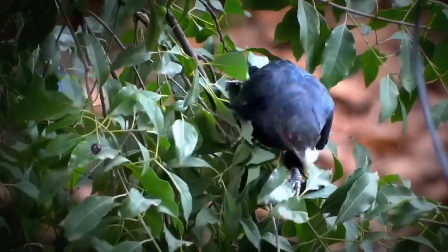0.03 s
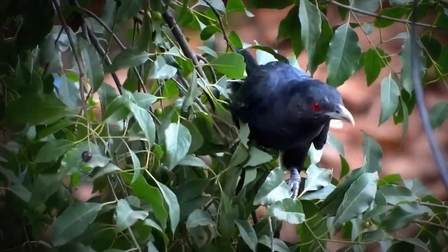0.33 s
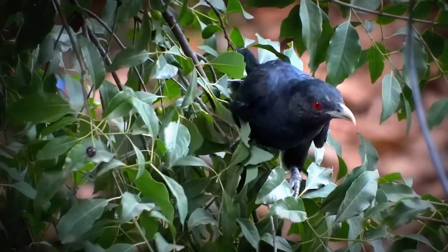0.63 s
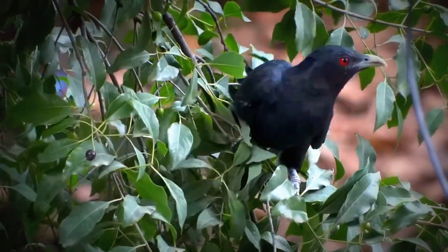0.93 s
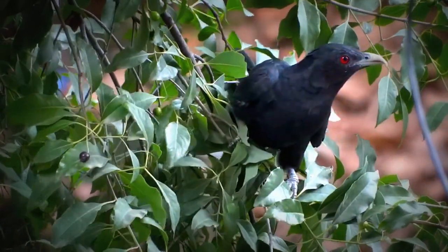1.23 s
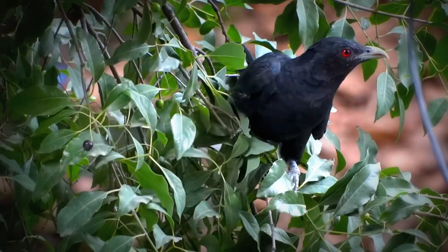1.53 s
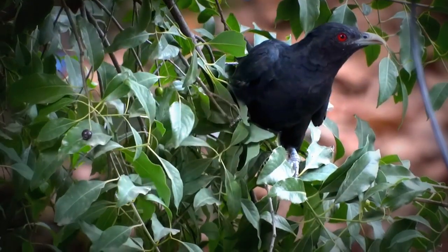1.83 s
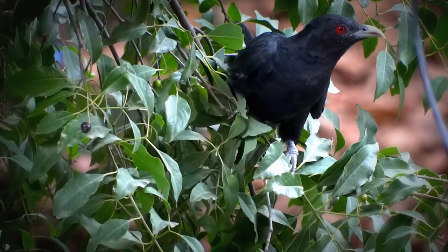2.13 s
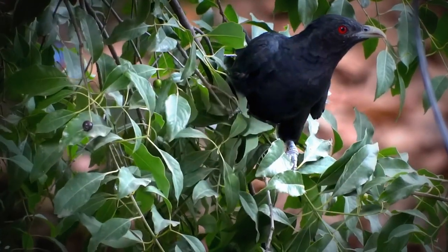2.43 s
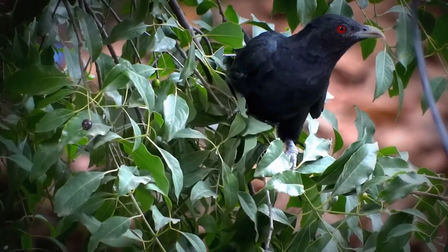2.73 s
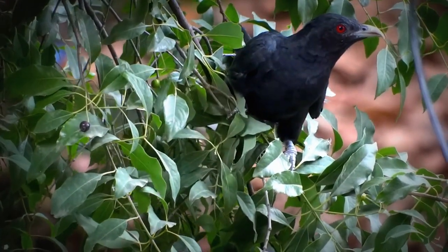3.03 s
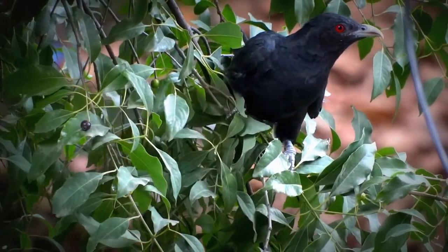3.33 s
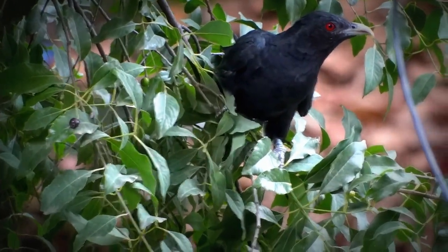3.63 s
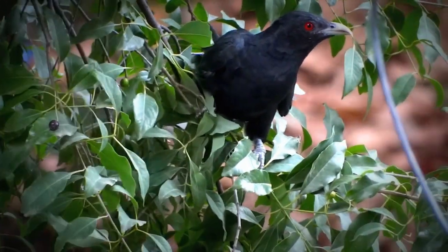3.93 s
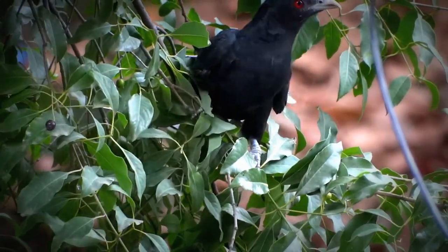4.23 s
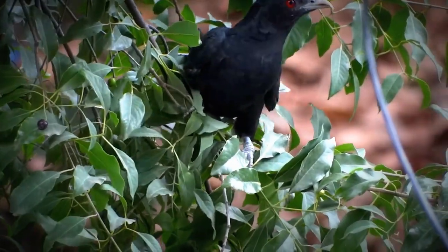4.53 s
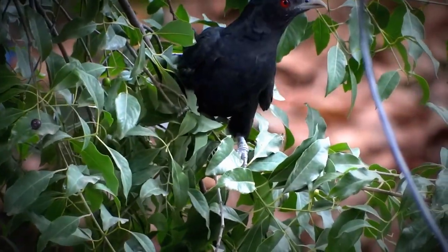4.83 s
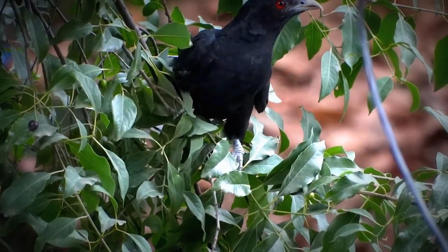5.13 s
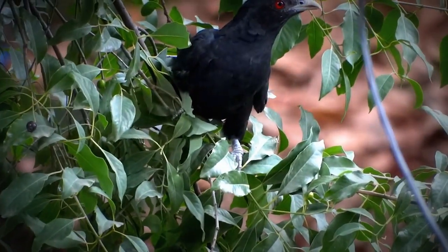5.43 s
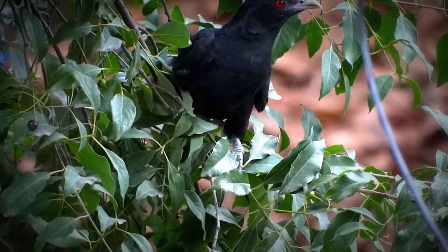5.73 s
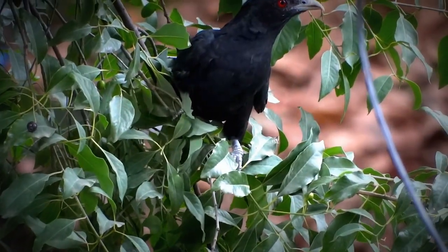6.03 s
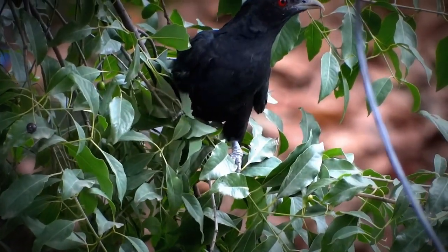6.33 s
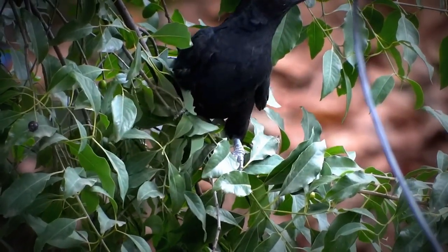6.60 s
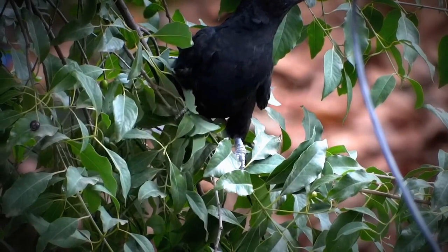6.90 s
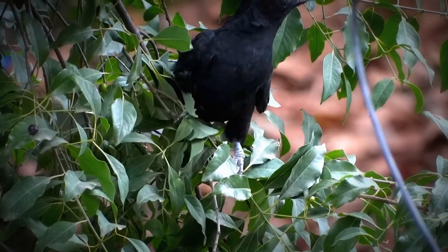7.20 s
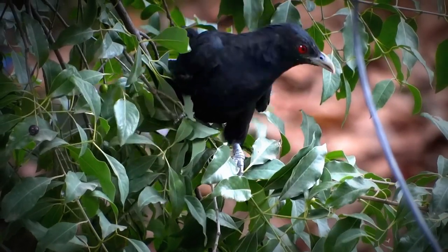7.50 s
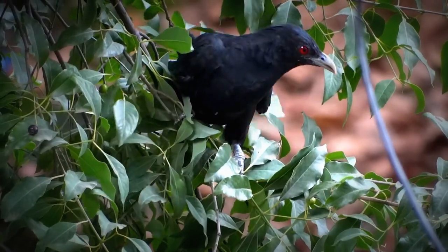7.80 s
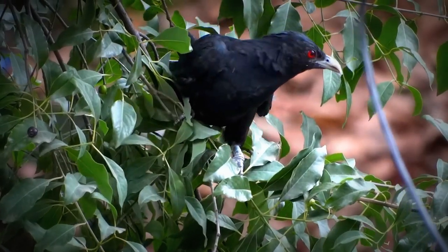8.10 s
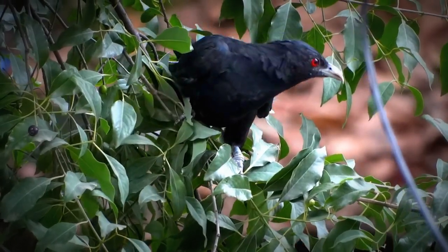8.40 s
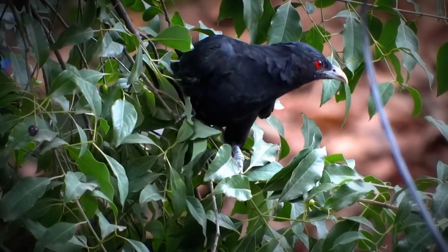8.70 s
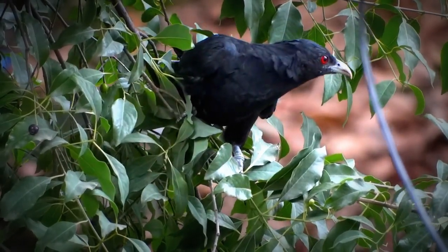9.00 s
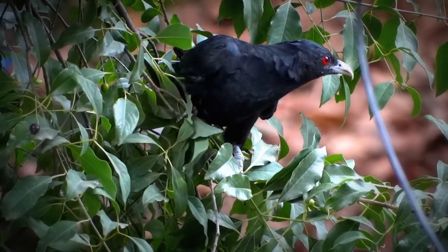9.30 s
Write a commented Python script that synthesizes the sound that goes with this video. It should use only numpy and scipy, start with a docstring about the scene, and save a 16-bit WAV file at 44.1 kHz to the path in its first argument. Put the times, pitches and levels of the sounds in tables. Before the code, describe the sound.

Several small birds trade quick chirps, sliding whistles and high whipping notes outdoors over a soft, steady background of air and far traffic.

```python
"""Small songbirds chatter in a leafy tree: two on the left whistle dips and long slides, one on the
right pips and whips upward, another repeats rising chirps. Each note is a trembling, nearly pure
syrinx tone, scattered by foliage; short lead-in notes open most phrases. Fainter birds call further
off, leaves brush together, an insect buzzes on and off, and distant traffic rumbles underneath."""
import sys
import numpy as np
from scipy import signal
from scipy.fft import rfft, irfft
from scipy.io import wavfile
from scipy.ndimage import uniform_filter1d, map_coordinates

SR = 44100
rng = np.random.default_rng(int(sys.argv[2]) if len(sys.argv) > 2 else 0)


def to_wav(s):
    """Save 16-bit WAV."""
    ch = np.atleast_2d(s).T  # columns
    pcm = np.round(np.clip(ch, -1, 1) * 32767)  # PCM
    wavfile.write(sys.argv[1], SR, pcm.astype(np.int16))


N = 421155

# Levels are relative, ahead of the mix gains. Pan is left minus right.
# Note contours. Each row: fraction of the note's length, pitch ratio, level in dB.
CHIRP_SHAPE = [(0, .6, -30), (.08, .7, -14), (.16, .77, -1), (.3, .85, .5), (.46, .94, -1), (.6, .99, 0),
               (.82, 1, 0), (.93, .99, -4), (1, .97, -15)]
SAG_SHAPE = [(0, .95, -17), (.15, 1, 3.5), (.45, 1.01, 3), (.7, .96, 3.5), (1, 0.81, -3)]
DIP_SHAPE = [(0, 1.46, -14), (.04, 1.4, -4), (.15, 1.22, -6), (.25, 1.04, 1), (.45, .99, -.5),
             (.6, .92, -7), (.68, 1.2, -7), (.74, 1.43, -5), (.86, 1.54, -4), (.96, 1.59, -6),
             (1, 1.6, -16)]
DIP_LEAD_SHAPE = [(0, .71, -17), (.2, .78, -12), (.4, .89, -6), (.62, .995, 0), (.8, 1, -4), (1, .96, -17)]
SLIDE_SHAPE = [(0, 1.09, -13), (.12, 1.01, -3), (.28, .95, -2), (.45, .84, -4), (.62, .69, -9),
               (.82, .57, -11), (1, .49, -20)]
WHIP_SHAPE = [(0, .57, -24), (.2, .55, -6), (.42, .525, -2), (.48, .51, -9), (.56, .61, -2),
              (.65, .71, 4.5), (.7, .82, -4), (.75, .95, -7), (.84, 1, -4), (.94, .995, -6), (1, .98, -19)]
PIP_SHAPE = [(0, .99, -18), (.25, 1.015, -7), (.55, 1.02, -3), (.72, 1, 2.5), (.85, .98, -1), (1, .94, -18)]
HOOT_SHAPE = [(0, 0.88, 0), (.3, 1, 3), (.6, 0.98, 5.5), (1, .94, -3.5)]
# Rising chirps. Each row: start and length in seconds, pitch in Hz, level, pan and swell in dB.
CHIRPS = [(2.439, 0.069, 3576, -37, -1, 13), (2.823, 0.072, 3540, -38, -1.5, 3),
          (3.957, 0.069, 3557, -34, -3, 5), (4.277, 0.071, 3560, -34, -2.5, -1.5),
          (4.599, 0.075, 3560, -35.5, -2.5, -5), (4.943, 0.082, 3590, -32.5, -3, -7.5),
          (5.267, .084, 3580, -34, -3.5, -3), (5.597, 0.079, 3573, -34, -3.5, -10),
          (8.997, 0.088, 3410, -39, -6, 4), (9.324, .075, 3644, -32, -8.5, 15)]
# Whistled notes. Each row: start and length in seconds, pitch in Hz, level and pan in dB.
DIPS = [(.398, 0.11, 3205, -39, 4.5), (.772, .11, 3243, -39, 5), (1.161, 0.11, 3240, -38.5, 5),
        (1.598, 0.11, 3216, -38, 5), (2.256, .107, 3197, -39.5, 5.5), (3.247, 0.1, 3206, -37, 5),
        (9.034, .107, 3163, -42, 4)]
SLIDES = [(.04, 0.25, 5370, -48, 5.5), (.472, 0.31, 5090, -40.5, 4.5), (.922, .25, 5136, -41, 5.5),
          (1.428, 0.27, 5060, -42, 4.5)]
WHIPS = [(-.068, 0.1, 6800, -38, -11), (2.322, .075, 7010, -36, -8), (2.6, 0.067, 6820, -35, -9),
         (2.909, 0.075, 6790, -34, -8), (7.05, 0.08, 6700, -33.5, -7), (7.327, 0.078, 6870, -32, -7.5),
         (7.613, 0.078, 6796, -31, -7)]
# Lead-in notes. Each row: lead time and length in seconds, pitch ratio, level offset in dB.
CHIRP_LEAD = [(0.075, 0.07, .51, -34)]
DIP_LEAD = [(0.126, .05, 1.0, -3.5)]
WHIP_LEAD = [(0.068, 0.0258, .615, -7), (.04, 0.0293, .728, -2)]
HOOT_LEAD = [(0.056, 0.062, .885, -7.5)]

# Swept calls. Each row: start and length in seconds, start and end pitch in Hz, level and pan in dB.
RASPS = [(.25, 0.11, 5090, 3690, -44.5, 4.5), (.85, 0.061, 4600, 5000, -38.5, 5),
         (2.335, .035, 5060, 4920, -41, -1), (4.885, 0.12, 4560, 3560, -47, 6),
         (5.08, 0.077, 5420, 4370, -46.5, 3.5), (8.255, 0.039, 5000, 4100, -59.5, -4),
         (8.548, 0.0264, 5370, 3765, -49, 0), (8.88, 0.048, 5200, 3800, -49.5, -1),
         (9.235, .068, 5570, 3830, -45.5, -3)]
FAINT_WHISTLES = [(0.934, 0.26, 2520, 2420, -63, 7), (1.094, 0.3, 2410, 2280, -64.5, 8),
                  (2.734, 0.049, 3790, 3430, -50, 5), (5.24, .35, 2368, 2372, -59.5, 8.5),
                  (5.555, .03, 3370, 3250, -59, 5), (6.75, 0.038, 3010, 2700, -57, 4),
                  (7.944, 0.065, 3850, 3160, -56, -7), (7.997, 0.054, 4570, 4360, -58, -7),
                  (7.998, 0.058, 2350, 2194, -67, -8)]
# Falling chirps. Each row: start and length in seconds, start pitch in Hz, level and pan in dB.
FALLS = [(2.483, 0.084, 3730, -55.5, 6), (3.32, 0.063, 3280, -68, 3), (3.992, 0.038, 3520, -57, 7),
         (5.644, .028, 5660, -52.5, 2), (6.024, 0.047, 3940, -48.5, 5), (7.768, 0.04, 3670, -61.5, 0),
         (9.402, 0.028, 3950, -53.5, -3)]
FALL_RATIO = .52  # end pitch over start pitch
# Thin peeps and high ticks. Each row: start in seconds, level in dB.
PEEPS = [(3.945, -57), (4.105, -58), (4.465, -60), (6.215, -52), (6.64, -63), (6.78, -62), (6.95, -64)]
TICKS = [(.28, -54), (1.206, -58), (1.435, -58), (4.008, -52), (4.823, -48), (5.669, -52), (6.55, -54),
         (7.337, -57)]
PEEP_S, PEEP_FROM_HZ, PEEP_TO_HZ = .06, 5140, 5160
TICK_S, TICK_FROM_HZ, TICK_TO_HZ = .014, 8200, 7500
# Last notes of three-note tinkles. Each row: start in seconds, start pitch in Hz, level and pan in dB.
TINKLES = [(8.515, 5070, -54, -1), (8.863, 5120, -57, -1), (9.207, 5940, -44.5, -10)]
TINKLE_S, TINKLE_RATIO = .041, .91
# Tinkle openings. Each row: lead time and length in seconds, start and end pitch in Hz, level in dB.
TINKLE_LEAD = [(.07, 0.037, 5820, 5670, -59), (.036, 0.059, 7150, 6480, -61.5)]
# Runs of upward flicks. Each row: start in seconds, count.
FLICK_RUNS = [(7.831, 7), (9.522, 1)]
FLICK_S, FLICK_FROM_HZ, FLICK_TO_HZ, FLICK_EVERY_S, FLICK_DB = .012, 2900, 6000, .147, -53
# Spells of twitter. Each row: start and length in seconds, note count.
TWITTERS = [(4.8, .9, 10), (7.8, 1.7, 22)]
TWITTER_HZ, TWITTER_S, TWITTER_DB = 4380, .0213, -60.5
# Soft hoots. Each row: start in seconds, pitch in Hz, level in dB.
HOOTS = [(.01, 892, -72), (.36, 1007, -69), (.97, 961, -73), (1.68, 996, -70), (2.691, 1014, -66),
         (3.3, 1006, -66.5), (4.879, 1050, -65.5), (5.75, 1014, -64), (6.49, 1016, -68)]
HOOT_S, HOOT_PAN_DB = .079, 4
# Distant calls. Each row: start and length in seconds, pitch in Hz, level in dB.
FAR_CALLS = [(0.698, 0.18, 1390, -73), (1.478, 0.18, 1370, -72.5), (4.204, 0.69, 637, -76),
             (5.225, 0.61, 658, -72.5), (6.25, 0.275, 1330, -78), (8.848, 0.23, 1336, -80)]

# Bouts of activity. Each row: start and length in seconds, level in dB.
RUSTLES = [(0, 0.22, -55.5), (0.75, 0.17, -51), (0.89, 0.25, -46), (3.536, .24, -50.5), (3.73, 0.2, -50),
           (3.913, 0.084, -49), (3.97, 0.57, -60.5), (4.145, 0.077, -57), (4.275, 0.16, -57.5),
           (4.812, 0.083, -54), (4.873, 0.15, -56)]
BUZZES = [(-.05, 0.48, -52.5), (0.422, 0.75, -53), (1.437, 0.78, -56.5), (2.101, 1.18, -52.5),
          (3.256, 0.35, -54), (3.679, 0.27, -49.5), (3.894, .3, -59), (5.642, 1.195, -55),
          (6.842, 1.08, -65.5)]
ENGINE_RUNS = [(-.6, 4.2, -59.5), (2.98, 3.4, -49.5)]
TRAFFIC_SWELLS = [(-.2, 1.3, -68), (6.7, 0.51, -57), (7.8, 0.65, -63.5)]
# Resonances. Each row: centre and width in Hz, level in dB.
INSECT_MODES = [(3545, 30, -8), (3775, 22, -2.5), (4000, 28, -9), (4245, 90, -6), (4730, 28, 3),
                (5085, 36, -1.5), (5310, 44, 2), (5480, 140, -4.5)]
ENGINE_MODES = [(68.4, 14, -1), (92.6, 20, -6.5), (124.4, 9.1, 1.5), (178, 3.8, -8)]
# Noise spectra. Each row: frequency in Hz, relative density in dB.
LEAF_SPECTRUM = [(2000, -18), (3500, -4.5), (5500, 0.5), (8000, -10.5), (11000, -16.5)]
INSECT_SPECTRUM = [(2500, -19), (3200, -9), (3750, 1.5), (4700, 0), (5400, -5), (6000, 1), (7000, -27.5)]
TRAFFIC_SPECTRUM = [(20, -23), (35, -2.5), (55, -3), (75, -0.5), (110, -6), (160, -5.5), (210, -13),
                    (300, -33), (500, -49)]
AIR_SPECTRUM = [(200, 2), (300, 4), (500, 0), (1000, -2), (1500, -4.5), (2200, -6.5), (3200, -11),
                (5000, -2.5), (6500, -6.5), (8000, -3), (9200, -5), (10000, -20), (11000, -28.5)]
AIR_SIDE_SPECTRUM = [(100, 4.5), (280, 7), (600, 5), (1200, 1), (2500, -9), (5000, -3),
                     (9000, -30), (11000, -110)]


def chirping_bird():
    """Rising chirps, each led by a soft low note that arches and sags."""
    chirps = sing(CHIRPS, CHIRP_SHAPE, waver=.009, flutter_db=2.4)
    leads = sing(lead_in(CHIRPS, CHIRP_LEAD), SAG_SHAPE, waver=.011, flutter_db=.5)
    return (undb(-5.5) * foliage(chirps, near_db=-6.5, near_t60_s=.19, far_db=-21, far_t60_s=.38)
            + linger(chirps, hz=3540, width_hz=350, db=-18.5, t60_s=.4)
            + foliage(leads, near_db=-12.5, near_t60_s=.2, far_db=-13, far_t60_s=.5))


def whistling_birds():
    """Two birds deep in the leaves, left: dips led by an upward chirp, and long falling slides."""
    dips = sing(DIPS, DIP_SHAPE, waver=.012, flutter_db=1.8, rasp=.008, climb_rasp=.04)
    slides = sing(SLIDES, SLIDE_SHAPE, waver=.008, flutter_db=1.8, rasp=.012)
    leads = sing(lead_in(DIPS, DIP_LEAD), DIP_LEAD_SHAPE, waver=.016, flutter_db=1.5)
    scattered = foliage(dips + slides + leads, near_db=-4, near_t60_s=.15, far_db=-12, far_t60_s=.5)
    return undb(-1.14) * scattered + linger(dips + slides, hz=5000, width_hz=300, db=-8, t60_s=.6)


def whipping_bird():
    """Two pips, then a whip up an octave, on the right."""
    whips = sing(WHIPS, WHIP_SHAPE, waver=.009, flutter_db=1.6, rasp=.008, climb_rasp=.025)
    pips = sing(lead_in(WHIPS, WHIP_LEAD), PIP_SHAPE, waver=.012, flutter_db=1.5, rasp=.014)
    song = echo(whips + pips, lag_s=.029, db=-14)
    return (undb(-4.5) * foliage(song, near_db=-3.5, near_t60_s=.16, far_db=-13.5, far_t60_s=.55)
            + linger(song, hz=6700, width_hz=500, db=-10, t60_s=.47))


def lead_in(notes, leads):
    """Opening notes follow their main note's pitch, level and pan."""
    return [(start - ahead_s, length_s, hz * ratio, db + offset_db, pan_db)
            for start, _, hz, db, pan_db, *_ in notes for ahead_s, length_s, ratio, offset_db in leads]


def sing(notes, shape, waver, flutter_db, rasp=0, climb_rasp=0):
    """A run of notes with one contour and one voice."""
    out = np.zeros((2, N))
    for start, *row in notes:
        add(out, start, note(shape, waver, flutter_db, rasp, climb_rasp, *row))
    return out


def note(shape, waver, flutter_db, rasp, climb_rasp, length_s, hz, db, pan_db, swell_db=0):
    """A contour scaled to length and pitch; climb_rasp adds hoarseness on fast rises."""
    fraction, ratio, shape_db = np.transpose(shape)
    along = np.linspace(0, 1, int(length_s * SR))
    pitch_hz = hz * np.interp(along, fraction, ratio)
    climb_per_s = np.gradient(np.log(pitch_hz)) * SR
    hoarseness = rasp + climb_rasp * np.clip(climb_per_s / 20, 0, 1)
    pitch_hz *= 1 + hoarseness * walk(1400, len(along))
    level_db = db + np.interp(along, fraction, shape_db) + swell_db * (along - .5)
    return pan(pan_db) * syrinx(pitch_hz, level_db, waver, flutter_db)


def syrinx(hz, db, waver, flutter_db):
    """A bird's voice: a nearly pure tone, trembling in pitch and level."""
    size = len(hz)
    tremble = waver * (walk(350, size) + walk(50, size))
    level_db = db + flutter_db * (walk(133.6, size) + walk(43.5, size) / 2)
    phase = 2 * np.pi * np.cumsum(hz * (1 + tremble)) / SR
    return np.sqrt(2) * np.sin(phase) * undb(level_db) * signal.windows.tukey(size, .08)


def foliage(x, near_db, near_t60_s, far_db, far_t60_s, width=.24):
    """Near leaves return a quick dense scatter; trees beyond add a diffuse tail."""
    t = np.arange(SR) / SR
    near = rng.standard_normal((2, SR)) * undb(-60 * t / near_t60_s) * (t > .002)
    far = rng.standard_normal((2, SR)) * undb(-60 * t / far_t60_s) * np.minimum(t / .04, 1)
    mid, side = (undb(near_db) * unit(near) + undb(far_db) * unit(far)) / np.sqrt(SR)
    echoes = np.array([mid + width * side, mid - width * side])
    return x + signal.fftconvolve(x, echoes, axes=1)[:, :N]


def linger(x, hz, width_hz, db, t60_s):
    """The held top of each note rings on in a narrow band among the trees."""
    t = np.arange(SR) / SR
    envelope = undb(-60 * t / t60_s) * np.minimum(t / .02, 1)
    tail = unit(rng.standard_normal(SR) * envelope) / np.sqrt(SR)
    tail = signal.lfilter(*signal.iirpeak(hz, hz / width_hz, fs=SR), tail)
    return undb(db) * signal.fftconvolve(x, tail[None], axes=1)[:, :N]


def echo(x, lag_s, db):
    """One reflection off a surface behind the tree."""
    out = x.copy()
    add(out, lag_s, undb(db) * x)
    return out


def faint_birds():
    """Clear and hoarse calls further off, plus the hoarse upswing that ends the dip at 0.77 s; a hoarse syrinx
    beats irregularly, widening its tone."""
    clear = glides(small_calls() + FAINT_WHISTLES, waver=.04, flutter_db=2.3)
    hoarse = glides(RASPS + twitter(), waver=.08, flutter_db=2) * walk(800)
    calls = clear + undb(-2) * (hoarse + scratches())
    return undb(-1.45) * foliage(calls, near_db=-4, near_t60_s=.15, far_db=-11, far_t60_s=.3)


def glides(notes, waver, flutter_db):
    """Calls that swell and fade on one sweep; wider sweeps waver more."""
    out = np.zeros((2, N))
    for start, length_s, from_hz, to_hz, db, pan_db in notes:
        size = int(length_s * SR)
        span = abs(np.log(to_hz / from_hz))
        tone = syrinx(np.geomspace(from_hz, to_hz, size), db, waver * span, flutter_db)
        add(out, start, pan(pan_db) * tone * signal.windows.hann(size) ** (1 / 3))
    return out


def small_calls():
    """Glide rows for peeps, falls and tinkles."""
    peeps = [(start, PEEP_S, PEEP_FROM_HZ, PEEP_TO_HZ, db, 2) for start, db in PEEPS]
    falls = [(start, length_s, hz, hz * FALL_RATIO, db, pan_db)
             for start, length_s, hz, db, pan_db in FALLS]
    tinkles = [(start, TINKLE_S, hz, hz * TINKLE_RATIO, db, pan_db) for start, hz, db, pan_db in TINKLES]
    openings = [(start - ahead_s, *row, 0) for start, *_ in TINKLES for ahead_s, *row in TINKLE_LEAD]
    return peeps + falls + tinkles + openings


def twitter():
    """Glide rows for tiny sweeps, random in time, pitch, slope, level and pan."""
    notes = []
    for start, length_s, count in TWITTERS:
        onsets = start + length_s * rng.random(count)
        for onset, (pitch, slope, strength, place) in zip(onsets, rng.uniform(-1.3, 1, (count, 4))):
            from_hz = TWITTER_HZ * 2 ** (.4 * pitch)
            to_hz = from_hz * 2 ** (.286 * slope - .15)
            notes.append((onset, TWITTER_S, from_hz, to_hz, TWITTER_DB + 4 * strength, 5 * place))
    return notes


def scratches():
    """Very short rough sweeps: ticks fall, flicks rise."""
    ticks = [(start, TICK_S, TICK_FROM_HZ, TICK_TO_HZ, db, 0) for start, db in TICKS]
    flicks = [(start + k * FLICK_EVERY_S, FLICK_S, FLICK_FROM_HZ, FLICK_TO_HZ, FLICK_DB, 0)
              for start, count in FLICK_RUNS for k in range(count)]
    return glides(ticks + flicks, waver=.1, flutter_db=2) * walk(1300)


def hooting_bird():
    """A far bird's soft hoots, each stepping up from a lower note."""
    hoots = [(start, HOOT_S, hz, db, HOOT_PAN_DB) for start, hz, db in HOOTS]
    voice = sing(hoots + lead_in(hoots, HOOT_LEAD), HOOT_SHAPE, waver=.0026, flutter_db=3)
    return foliage(voice, near_db=-12.5, near_t60_s=.2, far_db=-13, far_t60_s=.5)


def far_calls():
    """Distant wavering calls, smeared by the trees."""
    voice = sing([(*call, 0) for call in FAR_CALLS], HOOT_SHAPE, waver=.0409, flutter_db=4)
    return undb(-3.5) * foliage(voice, near_db=-5, near_t60_s=.89, far_db=-3.5, far_t60_s=1)


def leaves():
    """Leaves brush together in short swishes of fine crackle."""
    swell = np.zeros(N)
    for start, length_s, db in RUSTLES:
        add(swell, start, undb(db) * np.hanning(int(length_s * SR)))
    grains = unit(undb(3.4 * walk(1200) + 2 * walk(130)))
    return swell * grains * wide(LEAF_SPECTRUM, side_db=-14)


def insect(flat_fraction=.028, climb_s=.35, ring_db=2.5, flicker_db=.94):
    """A buzz just left of centre: hiss plus resonances that start each bout flat and creep up."""
    t = np.arange(N) / SR
    speed = np.ones(N)
    for start, length_s, _ in BUZZES:
        during = (t >= start) & (t < start + length_s)
        speed[during] = 1 - flat_fraction * np.exp((start - t[during]) / climb_s)
    ring = map_coordinates(resonate(INSECT_MODES), [np.cumsum(speed)], mode="mirror")
    buzz = unit(wide(INSECT_SPECTRUM, side_db=-12) + undb(ring_db) * ring)
    effort = bouts(BUZZES, attack_s=.09, release_s=.15) + undb(-74)
    return effort * undb(flicker_db * walk(25)) * buzz * pan(db=3.5)


def traffic():
    """A distant engine idles, then pulls, over road rumble that swells now and then."""
    engine = resonate(ENGINE_MODES) * bouts(ENGINE_RUNS, attack_s=.62, release_s=1.2)
    flow = undb(-54.5) + bouts(TRAFFIC_SWELLS, attack_s=.32, release_s=.2)
    rumble = wide(TRAFFIC_SPECTRUM, side_db=-25.5) * flow * undb(1.4 * walk(6.5))
    return engine + rumble


def air():
    """An even wash of still air and far town, wide in the midrange."""
    mid = noise(AIR_SPECTRUM) * undb(-59.5 + .074 * walk(.52))
    side = noise(AIR_SIDE_SPECTRUM) * undb(-63.5)
    return mid + side * np.array([[1], [-1]])


def bouts(rows, attack_s, release_s):
    """Gain that rises, holds and falls for each bout."""
    t = np.arange(N) / SR
    gain = np.zeros(N)
    for start, length_s, db in rows:
        rise = np.clip((t - start) / attack_s, 0, 1)
        fall = np.clip((start + length_s - t) / release_s, 0, 1)
        gain += undb(db) * rise * fall
    return gain


def resonate(modes):
    """Noise ringing in resonances, rms 1."""
    bins_hz = np.arange(N // 2 + 1) * SR / N
    gain = sum(undb(db) / (1 + (2 * (bins_hz - hz) / width_hz) ** 2) for hz, width_hz, db in modes)
    return unit(irfft(rfft(rng.standard_normal(N)) * gain, N))


def noise(spectrum):
    """Shaped noise, rms 1."""
    hz, db = np.transpose(spectrum)
    bins_hz = np.maximum(np.arange(N // 2 + 1) * SR / N, 1)
    gain = undb(np.interp(np.log(bins_hz), np.log(hz), db))
    return unit(irfft(rfft(rng.standard_normal(N)) * gain, N))


def wide(spectrum, side_db):
    """Stereo noise: a common part plus a weaker opposed part."""
    return noise(spectrum) + undb(side_db) * noise(spectrum) * np.array([[1], [-1]])


def walk(rate_hz, size=N):
    """Smooth random wander, spread near 1."""
    step = max(int(SR / rate_hz), 2)
    held = np.repeat(rng.standard_normal(size // step + 2), step)
    return uniform_filter1d(held, step)[:size] * np.sqrt(3 / 2)


def add(out, start_s, sound):
    """Mix a sound in, trimmed to the scene."""
    first = int(start_s * SR)
    part = sound[..., max(-first, 0):max(N - first, 0)]
    first = max(first, 0)
    out[..., first:first + part.shape[-1]] += part


def pan(db):
    """Left and right gains for a level difference."""
    return unit(undb(np.array([[db], [-db]]) / 2))


def undb(db):
    """Decibels to gain."""
    return 10 ** (np.asarray(db) / 20)


def unit(x):
    """Scale to rms 1."""
    return x / np.sqrt(np.mean(x ** 2))


def scene():
    """Birds, leaves and an insect over traffic and air."""
    near_birds = chirping_bird() + whistling_birds() + whipping_bird()
    far_birds = faint_birds() + hooting_bird() + far_calls()
    return near_birds + far_birds + leaves() + insect() + traffic() + air()


def record(dry):
    """Steep low-pass at 11 kHz."""
    return signal.sosfilt(signal.ellip(12, .2, 80, 11000, fs=SR, output="sos"), dry)


dry = scene()
out = record(dry)
to_wav(out)
```